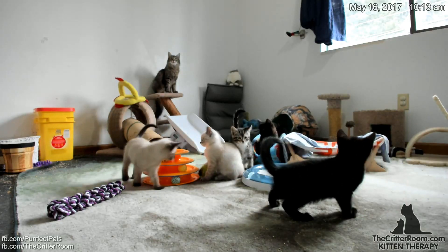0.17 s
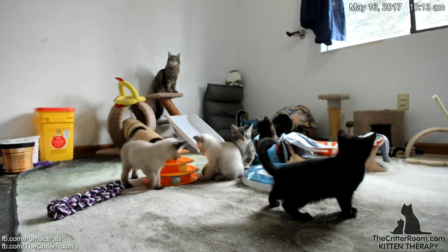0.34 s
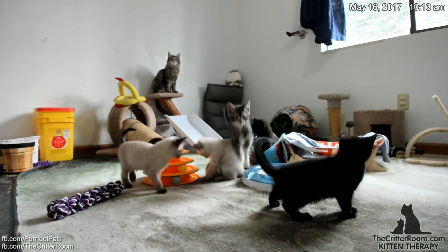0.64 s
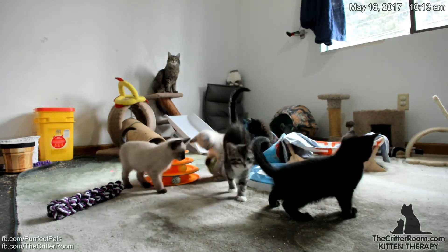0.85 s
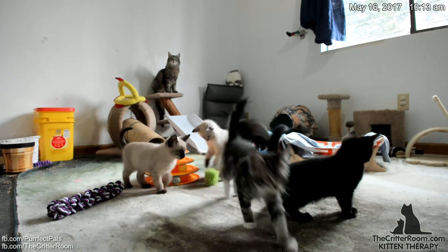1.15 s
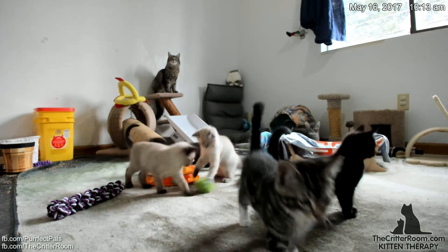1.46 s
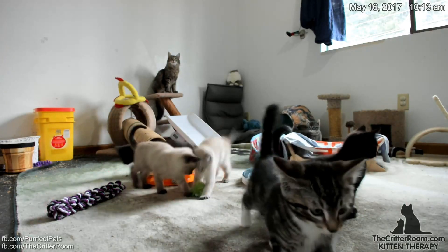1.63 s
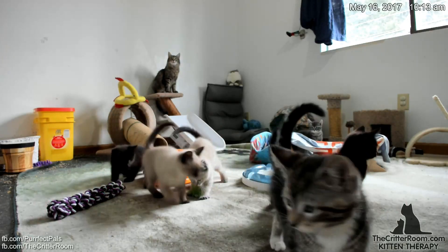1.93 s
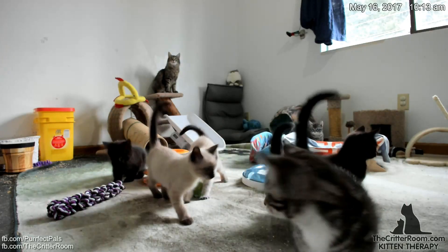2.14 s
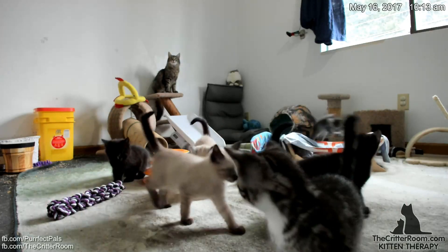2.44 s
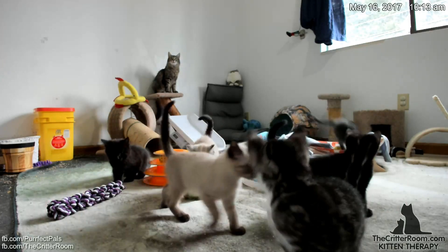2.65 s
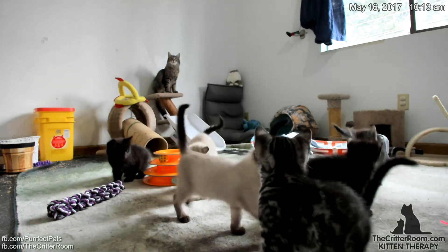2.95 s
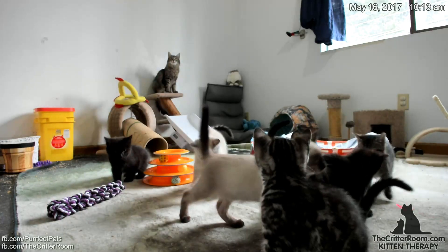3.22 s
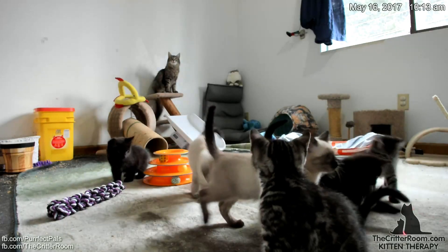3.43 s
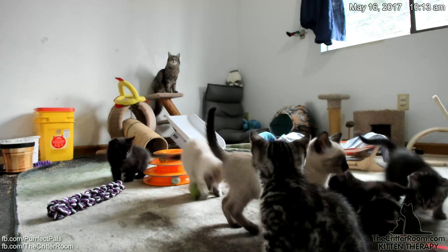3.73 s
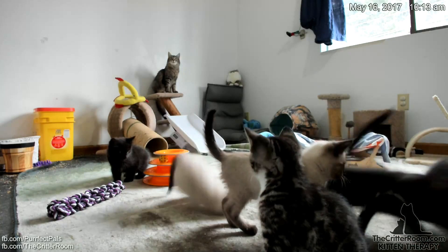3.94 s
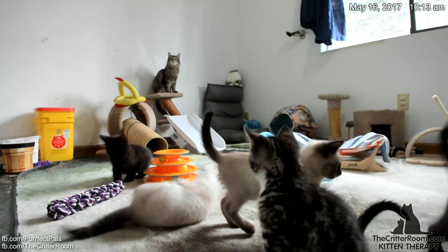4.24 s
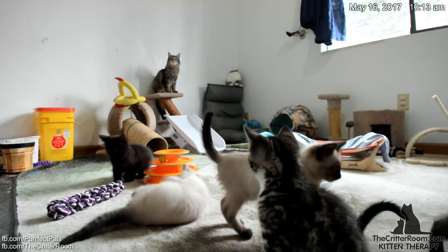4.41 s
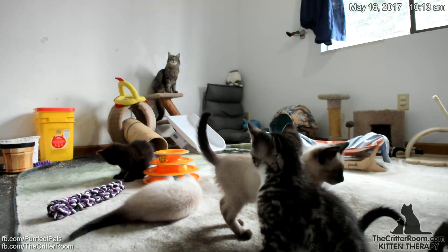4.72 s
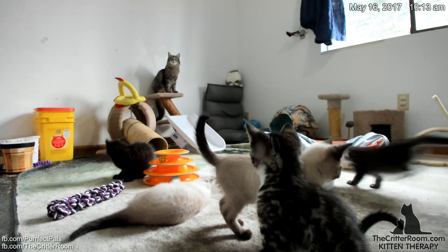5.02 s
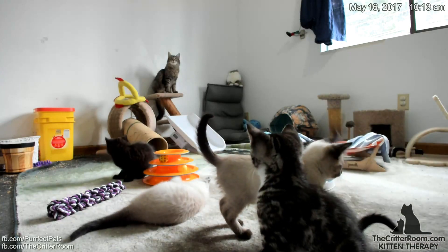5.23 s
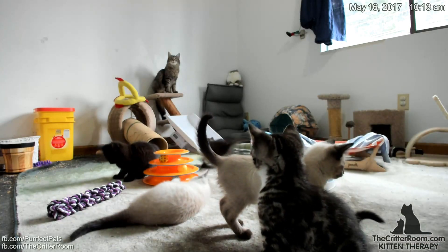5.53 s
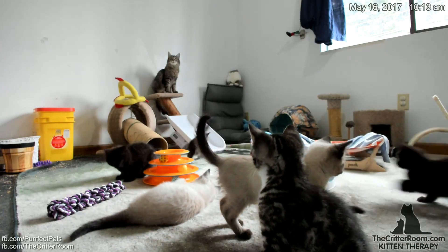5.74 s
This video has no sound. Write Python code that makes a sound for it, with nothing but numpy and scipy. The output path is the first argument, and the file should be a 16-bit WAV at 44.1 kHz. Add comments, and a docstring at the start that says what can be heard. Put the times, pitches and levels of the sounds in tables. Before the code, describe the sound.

Kittens scamper and pounce on a carpeted floor with soft low thuds, faint claw ticks, and one sharp plastic toy knock late on.

```python
"""A small, quiet room with a carpeted wooden floor, where kittens run and pounce.
Landing paws ring the floor's modes; claws tick as noisy snaps in a resonance, and fur scuffs the pile as grains.
Plastic toys get knocked, with a crack and a ring, and a ball murmurs round its track as resonant noise.
Under it all lie rumble, a low hum, a faint whine and hiss.
It is heard in wide stereo, the left channel leading by a nearly constant phase over most of the range."""
import sys
import numpy as np
from scipy import signal
from scipy.fft import rfft, irfft, next_fast_len
from scipy.io import wavfile

SR = 44100
rng = np.random.default_rng(int(sys.argv[2]) if len(sys.argv) > 2 else 0)


def log_audio(samples):
    """Write samples as a 16-bit WAV file to the path given in sys.argv[1]."""
    # one column per channel
    frames = np.atleast_2d(samples).T
    # limit to full scale, then quantise
    limited = np.clip(frames, -1, 1)
    pcm = np.round(limited * 32767).astype(np.int16)
    wavfile.write(sys.argv[1], SR, pcm)


N = 258867
T = np.arange(N) / SR   # time [s]


def from_db(db):
    """Decibels to gain."""
    return 10 ** (np.asarray(db) / 20)


def rms_one(x):
    """Scale to rms 1."""
    return x / np.sqrt(np.mean(x ** 2) + 1e-20)


def peak_one(x):
    """Scale to peak 1."""
    return x / np.abs(x).max()


def at_hz(points, hz):
    """Read a table on a log-frequency axis."""
    f, value = np.transpose(points)
    return np.interp(np.log(np.maximum(hz, 1)), np.log(f), value)


def shape(x, response):
    """Filter by a function of frequency."""
    size = next_fast_len(2 * x.shape[-1])
    hz = np.arange(size // 2 + 1) * SR / size
    return irfft(rfft(x, size) * response(hz), size)[..., :x.shape[-1]]


def drift(rate):
    """Slow chance: straight lines between random knots of spread 1, at this many knots a second."""
    knots = rng.standard_normal(4000)
    return np.interp(T * rate, np.arange(len(knots)), knots)


def resonate(x, hz, width_hz):
    """A two-pole resonance with gain 1 on top."""
    r = np.exp(-np.pi * width_hz / SR)
    zeros = np.array([1, 0, -1]) * (1 - r * r) / 2
    poles = [1, -2 * r * np.cos(2 * np.pi * hz / SR), r * r]
    return signal.lfilter(zeros, poles, x)


def dying(t, t60):
    """Falls by 60 dB in t60 seconds."""
    return np.exp(-np.log(1000) * t / t60)


def add(out, s, sound):
    """Mix a sound in at time s [s]."""
    at = max(round(s * SR), 0)
    part = sound[..., :max(N - at, 0)]
    out[..., at:at + part.shape[-1]] += part


# likeness of the two channels: (frequency [Hz], correlation [0-1])
LIKENESS = [(50, .98), (105, .97), (160, .65), (400, .68), (1300, .7), (5000, .63), (10000, .66),
            (15000, .8)]


def stereo(pair):
    """Two unrelated signals become a diffuse field, most alike in the bass."""
    def alike(hz):
        return np.clip(at_hz(LIKENESS, hz), 0, 1)
    mid = shape(pair[0], lambda hz: np.sqrt(1 + alike(hz)))
    side = shape(pair[1], lambda hz: np.sqrt(1 - alike(hz)))
    return np.array([mid + side, mid - side])


def coloured(pair, spectrum):
    """Diffuse sound with a given spectrum; rms 1."""
    return rms_one(shape(stereo(pair), lambda hz: from_db(at_hz(spectrum, hz))))


# early echoes off walls and furniture: (delay [s], level before the source's echo trim [dB])
ECHOES = [(.0135, -8), (.0155, -8), (.0235, -11), (.029, -7)]
# the room's ring: (frequency [Hz], t60 [s])
ROOM_T60 = [(300, .25), (1400, .26), (3000, .21), (6000, .19), (12000, .15)]


def room(x, echo_db, tail_db, build_s=0.012):
    """The direct sound, a few early echoes and a diffuse tail that dies sooner in the treble."""
    t = T[:SR // 2]
    edges = np.geomspace(125, 16000, 8)   # band edges [Hz]
    white = [stereo(pair) for pair in rng.standard_normal((2, 2, len(t)))]
    tail = 0
    for k, (low, high) in enumerate(zip(edges, edges[1:])):
        bandpass = signal.butter(2, [low, high], "band", fs=SR, output="sos")
        band = signal.sosfilt(bandpass, white[k % 2])   # neighbouring bands get unrelated noise
        tail = tail + band * dying(t, at_hz(ROOM_T60, np.sqrt(low * high)))
    tail = tail * (1 - np.exp(-(t / build_s) ** 2))
    response = from_db(tail_db) * rms_one(tail) / np.sqrt(len(t))   # tail_db sets the tail's energy
    for s, db in ECHOES:
        response[:, round(s * SR)] += from_db(db + echo_db)
    return x + signal.fftconvolve(x[None], response, axes=1)[:, :N]


# colour of the hiss: (frequency [Hz], relative level [dB per Hz])
AIR = [(88, -5), (150, 0), (302, 1.5), (326, -3.5), (445, -2), (490, -5.5), (894, -10), (985, -12),
       (1660, -10), (1940, -12), (2700, -13.5), (6730, -9.5), (15500, -14)]
# colour of the house's rumble: (frequency [Hz], relative level [dB per Hz])
RUMBLE = [(12, -2.5), (22, -8.5), (28, -37), (45, -1), (70, 4.5), (94, -8.5), (110, 0), (128, -14.5),
          (170, -34), (300, -50.5)]
# hum: (frequency [Hz], middle rms level [dB])
HUM = [(70, -52), (107.7, -56.5)]
# faint electrical whine: (frequency [Hz], rms level [dB])
WHINE = [(1001, -90), (2002, -90), (3000, -90.5), (4000, -90), (5001, -89)]


def background(hiss_db=-68.5, rumble_db=-50):
    """The house rumbles and hums under a smooth hiss; the hum drifts a little in level and phase."""
    hiss = from_db(hiss_db) * coloured(rng.standard_normal((2, N)), AIR)
    rumble = from_db(rumble_db) * coloured(rng.standard_normal((2, N)), RUMBLE)
    hum, whine = np.zeros(N), np.zeros(N)
    for hz, db in HUM:
        phase = 2 * np.pi * hz * T + .5 * drift(4)
        hum += from_db(db + 2 * drift(3)) * np.sqrt(2) * np.sin(phase)
    for hz, db in WHINE:
        whine += from_db(db) * np.sqrt(2) * np.sin(2 * np.pi * hz * T)
    return hiss + rumble + hum + whine


# fur and paws brushing the carpet, each a swell that fades:
# (time at its height [s], strength [dB], rise time constant [s], fall time constant [s])
SCUFFS = [(0.9, -69.5, 0.045, 0.17), (1.54, -66.5, 0.16, 0.078), (2.77, -66, 0.058, 0.15),
          (3.65, -67, 0.098, 0.045), (3.985, -57, 0.27, 0.15), (4.482, -55.5, 0.014, 0.018),
          (4.82, -70, 0.6, 0.9), (5.31, -57.5, 0.023, 0.079), (5.58, -60, 0.045, 0.024),
          (5.78, -64, .07, 0.08)]


def scuff_level():
    """How hard the carpet is being brushed, as a gain over time."""
    level = np.zeros(N)
    for s, db, rise_s, fall_s in SCUFFS:
        level += from_db(db) * np.exp(np.minimum((T - s) / rise_s, (s - T) / fall_s))
    return level


# colour of the brushed pile: (frequency [Hz], relative level [dB per Hz])
PILE = [(200, -5), (400, 13), (700, 4), (1100, -2.5), (1700, -2.5), (2600, -3), (5000, -8.5), (9000, -9),
        (15000, -40)]


def scuffs(level_db=-6, per_s=1500):
    """Fibres flick past fur and claws as tiny random grains whose level flutters."""
    signs = rng.choice([-1, 1], (2, N))
    grains = signs * (rng.random((2, N)) < per_s / SR)
    return scuff_level() * from_db(level_db + 2 * drift(40)) * coloured(grains, PILE)


def faint_ticks(per_s=16.0, above_scuff_db=7.0, middle_hz=743, spread_octaves=0.51, length_s=0.0024):
    """Claws touch at random, as strongly as the paws scuff: rows (s, peak dB, Hz, length s)."""
    late, size, pitch = rng.standard_normal((200, 3)).T
    s = (np.arange(len(late)) + .5 * late) / per_s
    scuff_db = 20 * np.log10(np.interp(s, T, scuff_level()) + 1e-9)
    db = scuff_db + above_scuff_db + 2 * size
    hz = middle_hz * 2 ** (spread_octaves * pitch)
    return [(at, level, f, length_s) for at, level, f in zip(s, db, hz) if 0 < at < T[-1]]


# claws that catch hard in the pile or on a toy:
# (time [s], peak level [dB], resonance [Hz], scrape time constant [s])
CLAWS = [(0.69, -52, 567, 0.00077), (0.899, -54, 520, 0.0069), (2.345, -59, 424, 0.0096),
         (3.48, -56.5, 990, 0.0012), (3.605, -48, 950, 0.0011), (3.634, -52, 1200, 0.0012),
         (3.672, -49, 940, 0.0009), (3.811, -43, 6650, 0.0031), (3.835, -55, 448, 0.0026),
         (3.895, -48.5, 1180, 0.0016), (3.943, -44.5, 870, 0.0034), (3.966, -44.5, 380, 0.0078),
         (4.007, -41, 540, 0.0045), (4.034, -47, 420, .007), (4.382, -53, 444, 0.0012),
         (5.065, -55.5, 630, 0.0015), (5.415, -55, 4140, .043)]


def claws(width_share=.7, grit_db=-18):
    """A claw slips off a loop of yarn: a snap and a short gritty scrape through broad resonances."""
    out, t = np.zeros(N), T[:SR // 5]
    for s, db, hz, length_s in CLAWS + faint_ticks():
        force = from_db(grit_db) * rng.standard_normal(len(t)) * np.exp(-t / length_s)
        force[0] += 1   # the snap
        tick = resonate(resonate(force, hz, width_share * hz), hz, hz)
        # the pile muffles what lies far above the resonance
        muffle = signal.butter(2, min(2 * hz, .4 * SR), fs=SR, output="sos")
        tick = signal.sosfilt(muffle, tick)
        add(out, s, from_db(db) * peak_one(tick))
    return out


def rolling_ball(start_s=5.27, start_db=-69.5, loss_db_per_s=29, track_hz=1670, width_hz=620,
                 rough_db=2.0, rise_s=0.012):
    """The ball's rough skin keeps its plastic track murmuring, unevenly and ever more softly."""
    t = np.maximum(T - start_s, 0)
    skin = stereo(rng.standard_normal((2, N)))
    murmur = rms_one(resonate(resonate(skin, track_hz, width_hz), track_hz, width_hz))
    level = from_db(start_db - loss_db_per_s * t + rough_db * drift(40))
    return level * (1 - np.exp(-t / rise_s)) * murmur


# knocks on plastic toys: (time [s], body peak level [dB], chatter time constant [s], chatter share [0-1],
# hollow body [Hz], click [Hz], click against body [dB], ring strength before ring_db [dB])
KNOCKS = [(2.197, -56, 0.0025, 0.61, 2660, 7900, 5.5, -18), (2.201, -52, 0.0023, 0.53, 384, 7460, -14, -14),
          (2.449, -55, 0.01, 0.8, 980, 1400, -12, -15), (2.4615, -42.5, 0.0024, 0.97, 500, 1490, -2, -15),
          (2.472, -57, 0.0022, 1, 6050, 4300, -8, -14), (2.475, -45, 0.0016, 0, 765, 2440, 3.5, -10),
          (2.707, -63, 0.0032, 0.9, 2700, 2770, -23, -23),
          (5.1848, -24.5, 0.00079, 0.42, 1230, 3960, -12, 5.5)]
# what the plastic rings with: (frequency [Hz], relative level [dB], t60 [s])
PLASTIC = [(484, -14, .16), (592, -21, .15), (628, -21, .18), (705, -13, .2), (813, -23, .22),
           (1044, -22, .2), (1225, -17, .2), (1328, -23, .18), (1521, -25, .18), (1922, -27, .18),
           (2628, -35, .15), (3188, -36, .15), (4253, -34, .14)]


def toys(body_share=0.46, click_share=0.93, shell_db=-8, ring_db=-8, ring_rise_s=0.0067):
    """A knock is a hollow pock, a click and a broad shell crack, then a ring; returns cracks and rings."""
    cracks, rings, t = np.zeros(N), np.zeros(N), T[:SR // 2]
    for s, db, chatter_s, share, body_hz, click_hz, click_db, rings_db in KNOCKS:
        chatter = rng.standard_normal(len(t)) * t * np.exp(-t / chatter_s)
        force = share * chatter / np.linalg.norm(chatter)
        force[0] += 1 - share   # the rest of the blow is a single impulse
        body = resonate(force, body_hz, body_share * body_hz)
        click_width = click_share * click_hz
        click = resonate(resonate(force, click_hz, click_width), click_hz, click_width)
        shell = resonate(resonate(force, 2000, 4500), 2000, 8000)
        crack = peak_one(body) - from_db(click_db) * peak_one(click)
        crack = crack + from_db(shell_db) * peak_one(shell)
        add(cracks, s, from_db(db) * crack)
        ring = np.zeros(len(t))
        for hz, level, t60 in PLASTIC:
            ring += from_db(level) * np.sin(2 * np.pi * (hz * t + rng.random())) * dying(t, t60)
        ring *= 1 - np.exp(-t / ring_rise_s)
        add(rings, s, from_db(db + rings_db + ring_db) * ring)
    return cracks, rings


# how lively the play is, as the weight that light steps build on: (time [s], level [dB])
BUSTLE = [(0.0, -62.5), (0.7, -62), (0.87, -40), (2.11, -67), (2.4, -42.5), (3.32, -61), (3.81, -32.5),
          (4.18, -46), (5.17, -35.5), (5.87, -42)]


def patter(per_s=9.0, above_bustle_db=2.0, spread_db=3.0):
    """Light steps at an uneven trot, heavier when play is lively: rows (s, weight dB, hardness dB)."""
    late, weight, hardness = rng.uniform(-1, 1, (100, 3)).T
    s = (np.arange(len(late)) + .5 + .4 * late) / per_s
    db = np.interp(s, *np.transpose(BUSTLE)) + above_bustle_db + spread_db * weight
    return [row for row in zip(s, db, spread_db * hardness) if row[0] < T[-1]]


def floor_ring(modes, rise_s, spread, scatter_db, detune):
    """Modes swell as the bending wave spreads, each as strong as the spot allows; peak 1."""
    t = T[:SR // 2]
    hz, db, t60 = np.transpose(modes)[:, :, None]
    strength, tuning, side = rng.standard_normal((3, len(modes), 1))
    swell = 1 - np.exp(-(t / rise_s) ** 2)
    level = from_db(db + scatter_db * strength) * swell * dying(t, t60)
    angle = 2 * np.pi * hz * (1 + detune * tuning) * (t - rise_s)
    # spread [radians] turns the phase of each mode oppositely in the two channels
    left = np.sum(level * np.cos(angle + spread * side), axis=0)
    right = np.sum(level * np.cos(angle - spread * side), axis=0)
    return peak_one(np.array([left, right]))


# modes of the floor, from joists to boards: (frequency [Hz], relative level [dB], t60 [s])
JOISTS = [(46.5, 2.5, 1), (51.88, 6.5, 1)]
SPAN = [(70.3, 5, 0.18), (83.55, -2.5, 0.38), (86, 17.5, 0.043), (110.3, -30.5, 0.8)]
BOARDS = [(116, 12.5, 0.21), (132.9, 0.5, 0.21), (145.5, -4.5, 0.33), (165, -5.5, 0.45), (198, -12.5, 0.36),
          (226, -9.5, 0.2), (231.6, -23, 0.56), (266.6, -20, 0.33), (297, -11.5, 0.052)]
# pounces and firm landings: (time [s], weight [dB], hardness [dB]: 0 is an ordinary paw, more is stiff-legged)
LANDINGS = [(0.395, -41.5, -7), (0.681, -23.5, -1.5), (0.924, -37, 5.5), (0.976, -37.5, -1),
            (1.314, -30, -8), (1.403, -33, 1), (1.823, -36, 0), (2.173, -30, -12.5), (2.505, -34, 1),
            (2.586, -41, 6), (2.753, -30.5, -8.5), (2.932, -30, -2), (3.311, -31, -4.5),
            (3.554, -21.5, 1.5), (3.592, -24.5, -4.5), (3.732, -30, 2), (3.819, -39, 9), (3.889, -23, -2),
            (3.964, -29, 12.5), (4.004, -36, 16.5), (4.14, -44, 19), (4.405, -34, 3.5), (4.444, -30.5, -9),
            (4.477, -35.5, 14), (4.56, -37, -9), (4.874, -27, -1), (5.016, -25.5, -9), (5.101, -35.5, 3),
            (5.195, -32, 6), (5.367, -29, 4.5), (5.446, -26, 8.5), (5.521, -23.5, -2.5), (5.701, -20.5, 3),
            (5.804, -23, -6)]


def paws(stiff_db=-13, knock_db=3, pat_db=-17.5, pat_t60=0.27, ahead_s=0.01042, lowest_hz=36):
    """Each landing rocks the joists, booms the floor and knocks the boards; the pad adds a dull pat."""
    out, t = np.zeros((2, N)), T[:SR // 2]
    pat_level = np.zeros(N)
    pat_swell = dying(t, pat_t60) * (1 - np.exp(-t / 0.013))
    for s, weight, hardness in LANDINGS + patter():
        knock = weight + hardness + stiff_db
        sway = -37 + 0.37 * (knock + 40)   # -37 dB under a knock of -40 dB, following 0.37 of its swing
        first = s - ahead_s   # high bending waves travel fastest and arrive first
        # scatter is random either way, so its sign does not matter
        boom = floor_ring(SPAN, rise_s=0.02758, spread=0.051, scatter_db=-1.0, detune=0.045)
        rock = floor_ring(JOISTS, rise_s=.03, spread=.06, scatter_db=4, detune=.02)
        rap = floor_ring(BOARDS, rise_s=0.01569, spread=0.85, scatter_db=-0.5, detune=0.04)
        add(out, s, from_db(weight) * boom)
        add(out, s, from_db(sway) * rock)
        add(out, first, from_db(knock + knock_db) * rap)
        add(pat_level, first, from_db(knock + pat_db) * pat_swell)
    # the floor radiates little below its lowest mode
    out = signal.sosfilt(signal.butter(3, lowest_hz, "high", fs=SR, output="sos"), out)
    # colour of the pad: (frequency [Hz], relative level [dB per Hz])
    pad = [(150, -3), (250, 1.0), (450, -17.5), (800, -26.5), (2000, -29.0), (8000, -38)]
    return out + pat_level * coloured(rng.standard_normal((2, N)), pad)


def scene():
    """Everything in the room; claws sound from inside the pile, which swallows their early echoes."""
    cracks, rings = toys()
    plastic = room(cracks, echo_db=-6, tail_db=2) + rings
    ticks = room(claws(), echo_db=-16, tail_db=-6)
    return background() + scuffs() + ticks + rolling_ball() + plastic + paws()


# phase lead of the left channel: (frequency [Hz], lead [radians])
LEAD = [(45, -.05), (75, .25), (110, .5), (160, 1.3), (1000, 1.35), (5000, 1.45), (10000, 1.05),
        (15500, .25)]
# left against right: (frequency [Hz], level difference [dB])
BALANCE = [(48, 2.5), (65, 2), (80, -2.3), (108, -1.5), (125, -4), (160, -2.5), (250, 0), (1000, 0)]


def record(dry, cutoff_hz=15300):
    """A phase lead on the left widens the image, bass levels differ between the sides; the top is cut."""
    sign = np.array([[.5], [-.5]])   # each channel takes half the difference

    def widening(hz):
        return np.exp(1j * sign * at_hz(LEAD, hz)) * from_db(sign * at_hz(BALANCE, hz))
    wide = shape(dry, widening)
    return signal.sosfilt(signal.ellip(10, .1, 80, cutoff_hz, fs=SR, output="sos"), wide)


dry = scene()
out = record(dry)
log_audio(out)
```